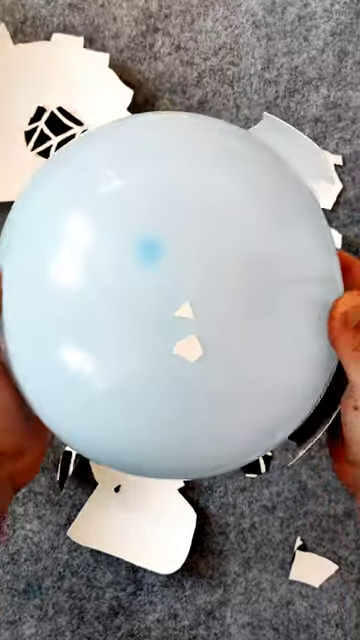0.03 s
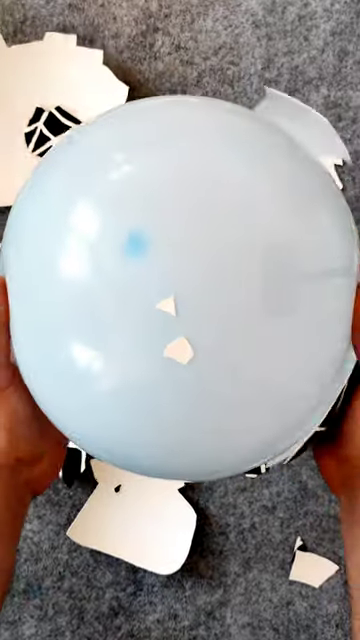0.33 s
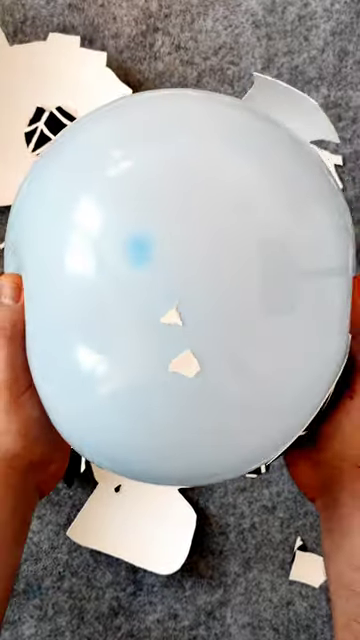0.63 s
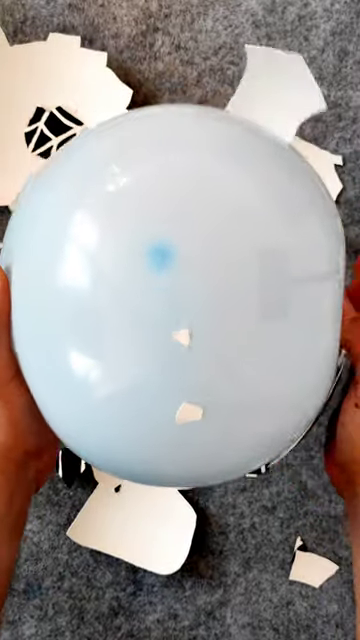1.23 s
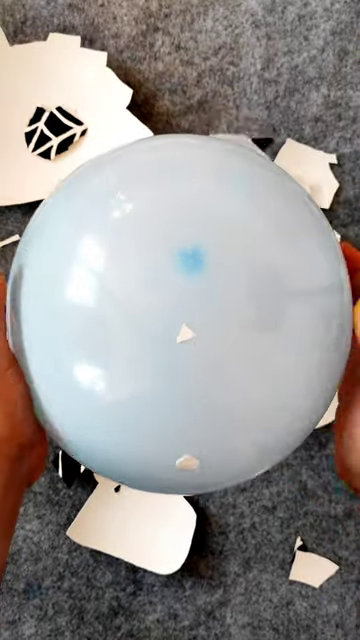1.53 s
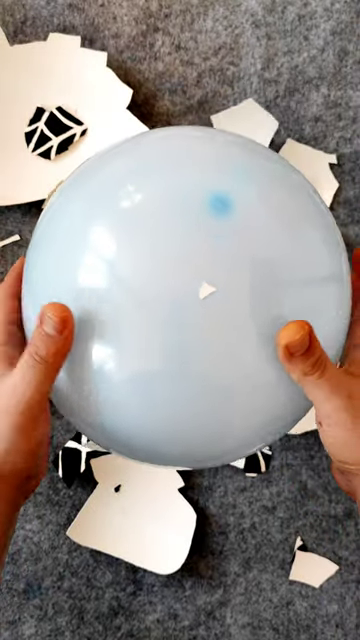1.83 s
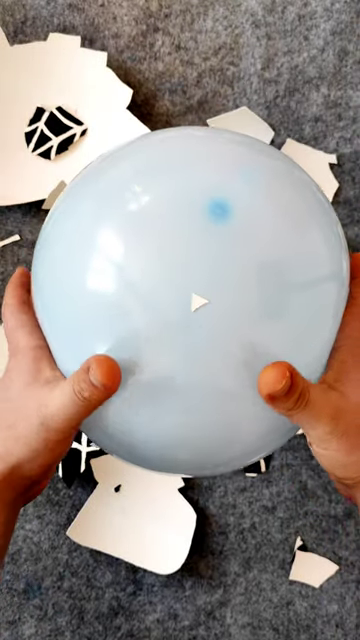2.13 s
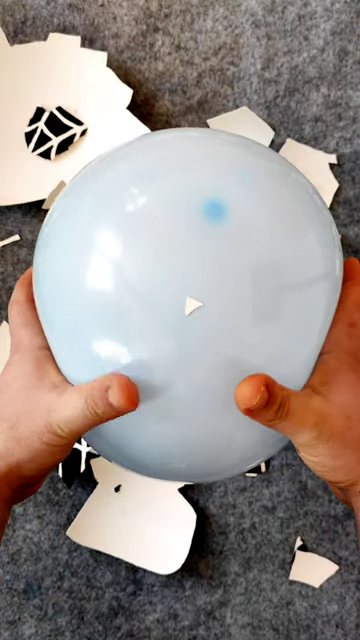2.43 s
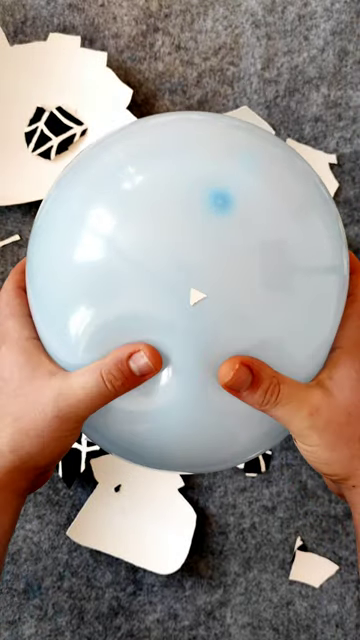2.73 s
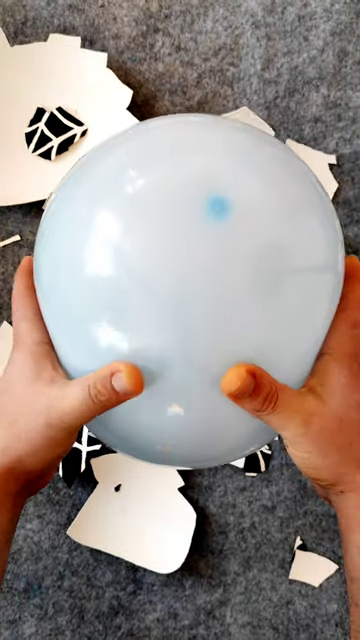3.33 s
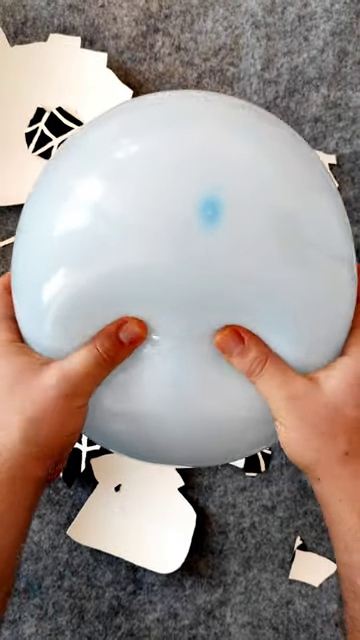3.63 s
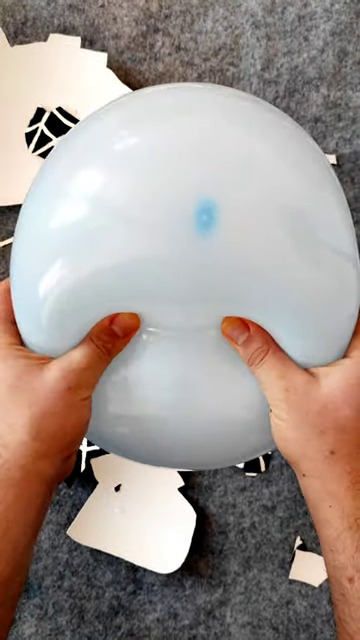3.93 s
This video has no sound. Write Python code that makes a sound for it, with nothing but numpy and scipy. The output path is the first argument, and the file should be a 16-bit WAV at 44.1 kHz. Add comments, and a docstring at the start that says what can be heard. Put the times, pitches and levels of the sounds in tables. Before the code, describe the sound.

A balloon is worked out of a thin, brittle shell, with dry snaps, scrapes and soft rubber thumps on the right. Then thumbs squeeze it twice straight ahead, making an uneven, rasping judder, close by in a small room.

```python
"""Scraping and dry snaps on the right: two hands work a balloon out of a thin, brittle shell,
above a carpet in a small live room. Pieces crack, catch and slip over the rubber, and drop;
the taut skin thumps under them. Then the thumbs dig in twice, straight ahead, and the rubber
sticks and slips in an uneven, rasping judder."""
import sys
import numpy as np
from scipy import signal
from scipy.fft import rfft
from scipy.io import wavfile
from scipy.ndimage import uniform_filter1d

SR = 44100
rng = np.random.default_rng(int(sys.argv[2]) if len(sys.argv) > 2 else 0)


def transcribe(signal):
    """Save signal, clipped to [-1, 1], as a 16-bit WAV file at the path in sys.argv[1]."""
    frames = np.atleast_2d(signal).T
    limited = np.clip(frames, -1, 1)
    pcm = np.round(limited * 32767).astype(np.int16)
    wavfile.write(sys.argv[1], SR, pcm)


N = 176400
T = np.arange(N) / SR


def amp(db):
    return 10 ** (np.asarray(db) / 20)


def unit_rms(x):
    return x / np.sqrt(np.mean(x ** 2) + 1e-20)


def curve_at(points, hz):
    f, value = np.transpose(points)
    return np.interp(np.log(hz + 1), np.log(f + 1), value)


def add(mix, start_s, sound):
    part = mix[max(round(start_s * SR), 0):][:len(sound)]
    part += sound[:len(part)]


def lowpass(x, hz, run=signal.sosfilt):
    return run(signal.butter(2, hz, fs=SR, output="sos"), x)


def at_peak_level(x, db):
    """Scales by the RMS of the loudest 4 ms."""
    return amp(db) * x / np.sqrt(uniform_filter1d(x ** 2, size=176).max())


def at_mean_level(x, length_s, db):
    return amp(db) * x / np.sqrt(np.sum(x ** 2) / (length_s * SR))


def colour(x, spectrum, tilt_db=0, pivot_hz=1000):
    """Minimum-phase filter; the tilt is a shelf above the pivot."""
    hz = abs(np.fft.fftfreq(4096, 1 / SR))
    shelf_db = tilt_db * hz ** 2 / (hz ** 2 + pivot_hz ** 2)
    log_gain = np.log(amp(curve_at(spectrum, hz) + shelf_db))
    taps = np.fft.ifft(np.exp(np.conj(signal.hilbert(log_gain)))).real
    return signal.oaconvolve(x, taps[:len(taps) // 2])[:len(x)]


def ring(x, modes, t60_s, ring_db, detune):
    """Adds a body's decaying modes to its excitation."""
    t = T[:SR // 2]
    tail = sum(amp(db - 60 * t / t60_s) * np.cos(2 * np.pi * hz * (1 + detune * rng.normal()) * t)
               for hz, db in modes)
    return x + amp(ring_db) * signal.oaconvolve(x, tail / np.linalg.norm(tail))[:len(x)]


def grains(per_s, spread_db, size=N):
    """Tiny slips: impulses of random time, strength and sign."""
    strength = amp(spread_db * np.minimum(rng.exponential(1, size), 3.5))
    return unit_rms((rng.random(size) < per_s / SR) * strength * rng.choice([-1, 1], size))


def stroke(length_s, per_s, spread_db, rise_s):
    """A run of slips that swells quickly and dies after its length."""
    t = T[:SR // 2]
    envelope = np.clip(t / rise_s, 0, 1) * np.exp(-(t / length_s) ** 4)
    return grains(per_s, spread_db, size=len(t)) * envelope


def crack(crumble_s, crumble_db):
    """A click with a crumbling tail, whitened so that no pitch stands out."""
    t = T[:SR // 4]
    crumble = rng.standard_normal(len(t)) * np.exp(-t / crumble_s)
    click = (t == 0) + amp(crumble_db) * crumble / np.linalg.norm(crumble)
    power = uniform_filter1d(abs(rfft(click)) ** 2, size=60)
    return colour(click, np.c_[np.fft.rfftfreq(len(t), 1 / SR), -10 * np.log10(power)])


# f/Hz, gain/dB
ROOM_TONE_SPECTRUM = [(25, -7), (70, -0.5), (400, -7), (1500, -15.5), (14000, -30)]
def room_tone():
    """Faint low noise, louder on the right."""
    common, side = [unit_rms(colour(rng.standard_normal(N), ROOM_TONE_SPECTRUM)) for _ in range(2)]
    return amp(-60.5) * np.array([common + 0.33 * side, common - 1.86 * side])


def moving(paths, x, fades_per_s=5, count=3):
    """Crossfades sets of random echo paths as the source moves."""
    fades = [np.cos(np.pi * (fades_per_s * T + k / count)) for k in range(count)]
    return np.sqrt(2 / count) * sum(paths(x * fade) for fade in fades)


# f/Hz, T60/s
ROOM_DECAY = [(150, 0.4), (1000, 0.55), (2800, 0.44), (14000, 0.35)]
# f/Hz, gain/dB
ECHO_SPECTRUM = [(100, -0.5), (400, 0), (1200, -1.5), (14000, 3)]
# f/Hz, left-right coherence
ECHO_COHERENCE = [(100, 1), (400, 1), (1000, 0.77), (2500, 0.79)]
def echoes(x):
    """Diffuse stereo tail, alike in both ears in the bass."""
    hz, t, (own, shared) = signal.stft(rng.standard_normal((2, SR * 2 // 3)), SR, nperseg=256)
    hz = hz[:, None]
    coherence = curve_at(ECHO_COHERENCE, hz)
    ears = np.array([coherence * shared + np.sqrt(1 - coherence ** 2) * own, shared])
    decay_per_s = np.log(1000) / curve_at(ROOM_DECAY, hz)
    envelope = np.exp(-decay_per_s * t) * np.sqrt(2 * decay_per_s / SR)
    tail = signal.istft(ears * envelope * amp(curve_at(ECHO_SPECTRUM, hz)), SR)[1]
    onset = np.clip(T[:tail.shape[1]] / 0.0026, 0, 1)
    return signal.oaconvolve(x[None], tail * onset, axes=1)[:, :N]


def room(x, wet_db):
    """Direct sound plus echoes."""
    return x + amp(wet_db) * moving(echoes, x)


# f/Hz, gain/dB
HEAD_SHADOW = [(60, -11), (200, -7.5), (700, -10), (2400, -5.5), (4400, -9.5), (8000, -24.5), (14000, -14)]
def far_ear(x, decay_s=0.0076):
    """The head shades the far ear; treble arrives only by many short detours."""
    def detours(treble):
        paths = rng.standard_normal(SR // 20) * np.exp(-T[:SR // 20] / decay_s)
        return signal.oaconvolve(treble, paths / np.linalg.norm(paths))[:N]
    low = lowpass(x, hz=1300, run=signal.sosfiltfilt)
    return colour(low + moving(detours, x - low), HEAD_SHADOW)


# t/s, length/s, f/Hz, level/dB
DRAG_HUMS = [(0.754, 0.03, 507, -35.5), (2.02, 0.068, 243.4, -47)]
def hums():
    """Dragged rubber hums at a wavering pitch."""
    out = np.zeros(N)
    for start_s, length_s, hz, db in DRAG_HUMS:
        arch = np.sin(np.pi * np.arange(0, 1, 1 / (length_s * SR)))
        waver = unit_rms(uniform_filter1d(rng.standard_normal(len(arch)), size=200))
        phase = 2 * np.pi * np.cumsum(hz * (1 + 0.083 * waver)) / SR
        add(out, start_s, 2 * amp(db) * arch * np.sin(phase))
    return out


# f/Hz, level/dB
SKIN_MODES = [(140, -3.5), (215, -2.5), (345, 2.5), (413, -1.5), (505, -2), (810, 1), (1355, -4),
              (1637, -28)]
# f/Hz, gain/dB
RUB_SPECTRUM = [(60, -6), (160, 0.5), (300, 8), (750, 1.5), (1400, -4.5), (2600, -13.5), (5000, -24),
                (14000, -47)]
# t/s, length/s, level/dB, tilt/dB
RUB_STROKES = [(0.196, 0.066, -47, 17), (0.291, .012, -33, 30.5), (.604, 0.019, -41, 2),
               (0.692, 0.071, -42.5, 1.5), (0.757, 0.014, -33.5, 34), (.847, 0.038, -37.5, 4),
               (1.151, 0.023, -31, 21.5), (1.383, 0.049, -42.5, 24), (1.916, 0.027, -37.5, 29.5),
               (1.977, 0.1, -38, 14), (2.37, 0.032, -35.5, 24.5), (3.232, 0.042, -37.5, -2),
               (3.978, 0.02, -37.5, -1.5)]
def rubs():
    """A finger or shell edge slips over the rubber in short runs."""
    out = np.zeros(N)
    for start_s, length_s, db, tilt_db in RUB_STROKES:
        slips = stroke(length_s, per_s=2100, spread_db=2.0, rise_s=0.0062)
        skin = ring(slips, SKIN_MODES, t60_s=0.066, ring_db=-23, detune=0.036)
        rub = colour(skin, RUB_SPECTRUM, tilt_db, pivot_hz=920)
        add(out, start_s, at_mean_level(rub, length_s, db))
    return out


# f/Hz, gain/dB
KNOCK_SPECTRUM = [(40, -18.5), (120, -3), (200, -1.5), (450, -1.5), (950, -7.5), (1600, -7.5),
                  (3000, -11.5), (14000, -39)]
def knocks(rows, crumble_s, crumble_db, ring_db):
    """Blows on the taut skin, which booms briefly."""
    out = np.zeros(N)
    for start_s, db, tilt_db in rows:
        skin = ring(crack(crumble_s, crumble_db), SKIN_MODES, t60_s=0.12, ring_db=ring_db, detune=0.069)
        knock = colour(skin, KNOCK_SPECTRUM, tilt_db, pivot_hz=1130)
        add(out, start_s, at_peak_level(knock, db))
    return out


# t/s, level/dB, tilt/dB
BALLOON_THUMPS = [(.038, -29, 9), (.199, -19.5, 7), (.604, -27, -2), (.838, -27, -5), (.845, -22.5, -1),
                  (.874, -23.5, 1), (1.035, -25.5, 6.5), (1.363, -28.5, 17), (1.408, -31, 3),
                  (1.611, -32, -21), (2.202, -34.5, -1.5)]
def thumps():
    """The balloon thumps under the shell pieces."""
    return amp(-1.5) * knocks(BALLOON_THUMPS, crumble_s=0.0041, crumble_db=12.5, ring_db=-33.5)


# t/s, level/dB, tilt/dB
THUMB_JUMPS = [(2.786, -31, -6), (2.928, -21.5, -4), (2.969, -28, 1), (3.383, -28.5, -7),
               (3.435, -28.5, -3), (3.471, -26.5, -8), (3.518, -26, -4), (3.574, -30, -3), (3.618, -28, 3),
               (3.852, -35.5, 10)]
def thumb_jumps():
    """A thumb jumps on the rubber and jolts the skin."""
    return amp(1) * knocks(THUMB_JUMPS, crumble_s=0.002, crumble_db=9, ring_db=-28)


def flutter(start_s, end_s):
    """Low rumble of the pressed skin."""
    gate = uniform_filter1d(1. * (T > start_s) * (T < end_s), size=2000)
    return amp(-50.5) * gate * unit_rms(lowpass(rng.standard_normal(N), hz=90))


# f/Hz, gain/dB
RASP_SPECTRUM = [(300, -10), (900, -1), (1600, 2), (2600, -3.5), (4400, -6), (5600, -10.5), (7300, -11.5),
                 (9000, -21.5), (14000, -28)]
# t/s, level/dB
RELEASE_TICKS = [(2.866, -34), (2.878, -33), (3.371, -34), (3.421, -34), (3.486, -33), (3.736, -39),
                 (3.818, -43), (3.885, -42)]
def ticks():
    """Stretched rubber lets go of a fingertip with a thin tick."""
    out = np.zeros(N)
    for start_s, db in RELEASE_TICKS:
        tick = colour(crack(crumble_s=0.002, crumble_db=12), RASP_SPECTRUM, tilt_db=2, pivot_hz=4000)
        add(out, start_s, at_peak_level(tick, db))
    return out


# f/Hz, gain/dB
JUDDER_SPECTRUM = [(30, -20), (110, -9), (200, -0.5), (420, 0), (700, -5), (1000, -14), (5000, -42)]
# t/s, judder level/dB, rasp level/dB
SQUEEZE_LEVELS = [(2.559, -77.5, -99), (2.658, -52.5, -54), (2.704, -36.5, -47), (2.77, -33, -45.5),
                  (2.82, -29.5, -37.5), (2.905, -33.5, -34), (2.945, -43.5, -42.5), (3.02, -36, -41),
                  (3.05, -47, -51), (3.085, -34.5, -37.5), (3.11, -51, -59), (3.22, -61, -53.5),
                  (3.3, -46, -49.5), (3.37, -39, -43.5), (3.46, -33, -40), (3.57, -33.5, -39.5),
                  (3.648, -30.5, -36), (3.681, -41.5, -45.5), (3.745, -46, -42.5), (3.795, -75, -53),
                  (3.86, -72, -49), (3.886, -39.5, -40), (3.905, -66, -56.5)]
def squeezes():
    """Thumbs stick and slip: coarse slips shake the skin; a rasp swells and brightens with force."""
    times_s, judder_db, rasp_db = np.transpose(SQUEEZE_LEVELS)
    coarse = grains(per_s=550, spread_db=1.0)
    judder = unit_rms(colour(coarse, JUDDER_SPECTRUM)) * amp(np.interp(T, times_s, judder_db) - 2)
    spurts = signal.oaconvolve(abs(coarse), np.exp(-T[:SR // 20] / 0.0071))[:N]
    fine = unit_rms(colour(grains(per_s=12000, spread_db=-0.5) * unit_rms(spurts), RASP_SPECTRUM))
    dull = lowpass(fine, hz=2100)
    force_db = np.interp(T, times_s, rasp_db)
    brightness = np.clip(amp(0.5 * (force_db + 45.5)), 0, 1)
    rasp = (brightness * fine + np.sqrt(1 - brightness ** 2) * dull) * amp(force_db - 1.5)
    return (judder + rasp) * (T > times_s[0])


# f/Hz, gain/dB
SHELL_SPECTRUM = [(200, -15.5), (800, 0.5), (1600, -5), (2500, -0.5), (3600, 3.5), (5400, 0), (7100, 2),
                  (8600, -13), (14000, -15.5)]
# f/Hz, level/dB
PIECE_MODES = [(3363, -4), (3600, -3), (3791, -4), (4110, -3), (4711, 5), (5230, -6), (6719, -17),
               (7416, 16)]
# t/s, length/s, level/dB, chirp f/Hz
SHELL_SCRAPES = [(0, 0.18, -41, 3470), (0.193, 0.056, -34, 6900), (.214, 0.026, -35.5, 3630),
                 (0.21, 0.059, -41.5, 5270), (0.293, 0.097, -44, 5400), (0.491, 0.047, -42, 2430),
                 (0.692, 0.2, -47, 5900), (0.842, 0.068, -43, 5900), (0.962, 0.38, -48.5, 1390),
                 (1.227, 0.039, -37, 2450), (1.286, 0.086, -34.5, 3810), (1.395, 0.11, -41, 4240),
                 (1.49, 0.021, -39.5, 2620), (1.503, 0.12, -35, 3980), (1.651, 0.029, -36.5, 6200)]
def scrapes():
    """Shell edges catch and slip in dense grains; each piece chirps at its own pitch."""
    out = np.zeros(N)
    for start_s, length_s, db, hz in SHELL_SCRAPES:
        catches = stroke(length_s, per_s=1100, spread_db=5.2, rise_s=0.003)
        shell = ring(catches, PIECE_MODES, t60_s=0.031, ring_db=-24, detune=0.034)
        chirp = amp(8) * signal.lfilter(*signal.iirpeak(hz, Q=14, fs=SR), shell)
        add(out, start_s, at_mean_level(colour(shell + chirp, SHELL_SPECTRUM), length_s, db))
    return out


# t/s, level/dB, tilt/dB, crumble decay/s
SHELL_SNAPS = [(.167, -28.5, 12, 0.0042), (0.184, -25, 16, 0.0049), (0.1995, -17, 8, 0.0035),
               (.293, -28.5, 24, 0.0045), (0.4999, -33, 2, 0.011), (0.5649, -22, 1.5, 0.0022),
               (0.6554, -24, 3, 0.0025), (.709, -31, -9, 0.0016), (.744, -25.5, 19, 0.0038),
               (.838, -22.5, 10, 0.0022), (0.8664, -20.5, 8, 0.0037), (1.0361, -21, 12.5, 0.0022),
               (1.085, -33, -7, 0.0024), (1.268, -24.5, -4, .001), (1.2878, -19, 12.5, 0.008),
               (1.3548, -20, 5, 0.004), (1.398, -15.5, 2, 0.0044), (1.5049, -23, 1, 0.0035),
               (1.5496, -24.5, 5, 0.0026), (1.8144, -26.5, 3.5, 0.0015), (2.2029, -34, 5, 0.0018),
               (2.375, -31, -7, 0.0037)]
def snaps():
    """Brittle pieces crack or knock together: dry clicks, no ring."""
    out = np.zeros(N)
    for start_s, db, tilt_db, crumble_s in SHELL_SNAPS:
        snap = colour(crack(crumble_s, crumble_db=18.5), SHELL_SPECTRUM, tilt_db, pivot_hz=4470)
        add(out, start_s, at_peak_level(snap, db))
    return amp(-2.5) * out


def scene():
    """Shell work on the right, then squeezes ahead. Table levels are before the mix gains."""
    turn_s = 2.55  # the hands move to the front
    rubbing = rubs() + hums()
    side = scrapes() + thumps() + rubbing * (T < turn_s)
    left, right = amp(2.5) * (room(side, wet_db=0.5) + room(snaps(), wet_db=-1))
    front = thumb_jumps() + squeezes() + flutter(start_s=2.56, end_s=3.78) + ticks()
    ahead = room(front + rubbing * (T >= turn_s), wet_db=-6.5) * amp([[-0.5], [0.5]])
    return room_tone() + ahead + np.array([far_ear(left), right])


def record(dry, cutoff_hz=14500):
    """Steep low-pass band limit."""
    taps = signal.firwin(401, cutoff_hz, window=("kaiser", 8), fs=SR)
    return signal.oaconvolve(dry, taps[None], "same")


dry = scene()
out = record(dry)
transcribe(out)
```